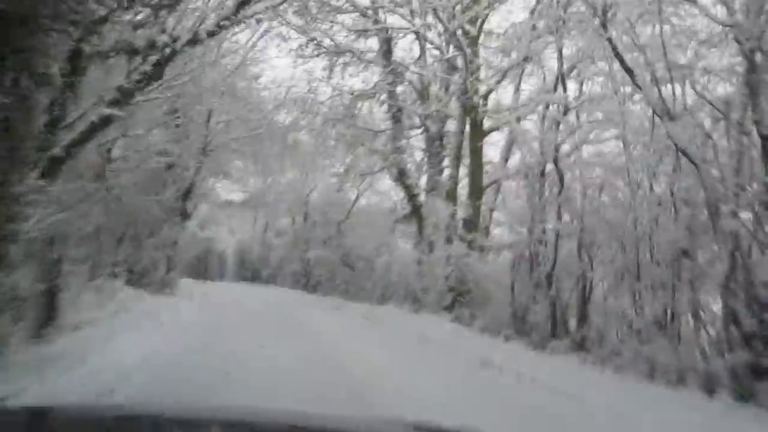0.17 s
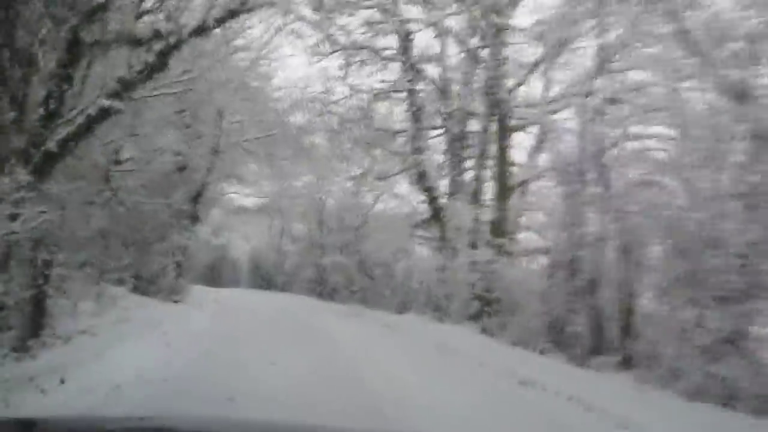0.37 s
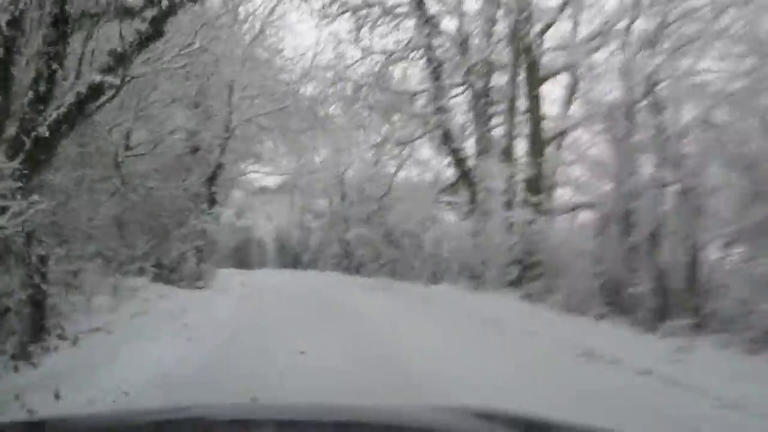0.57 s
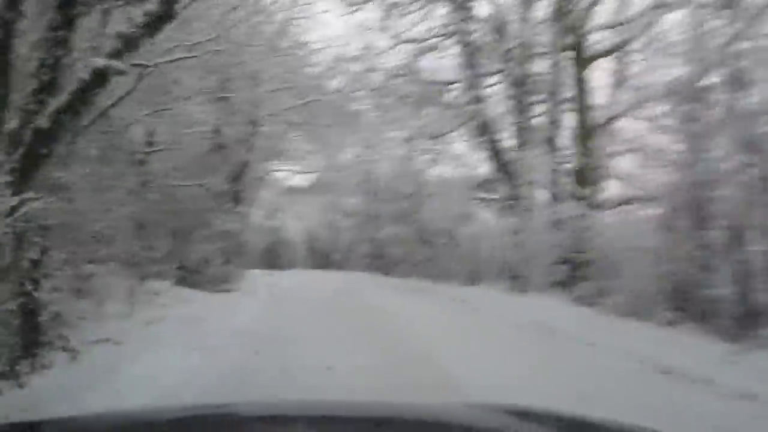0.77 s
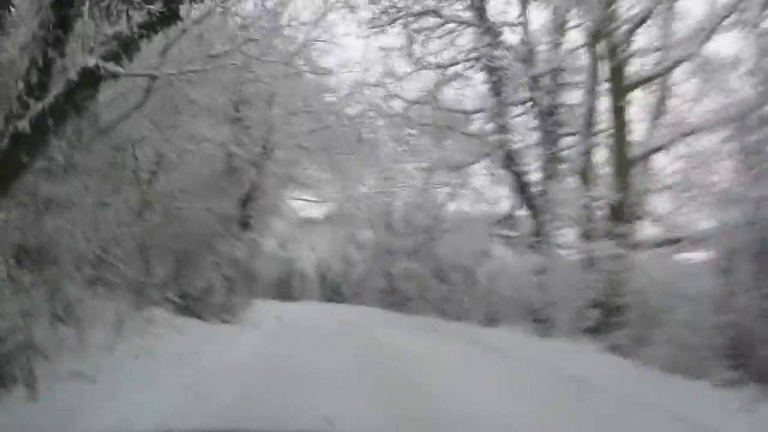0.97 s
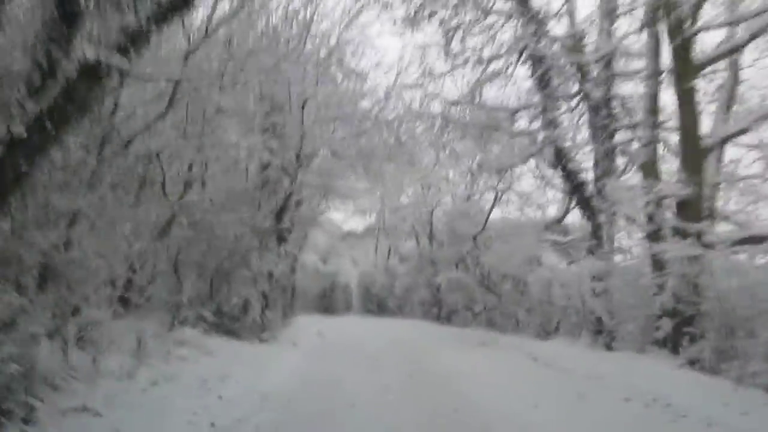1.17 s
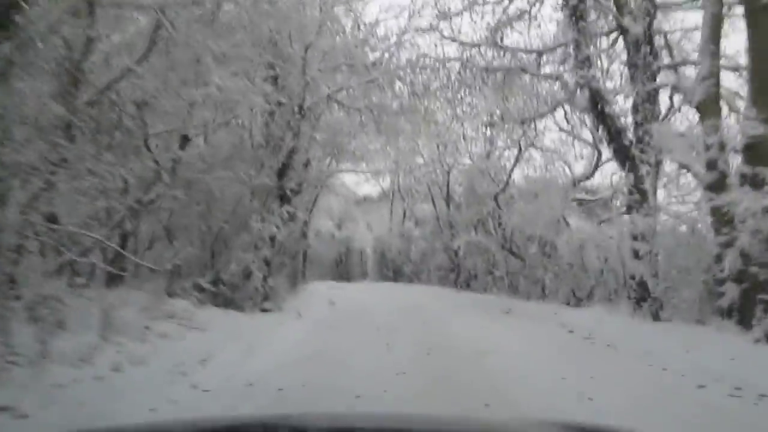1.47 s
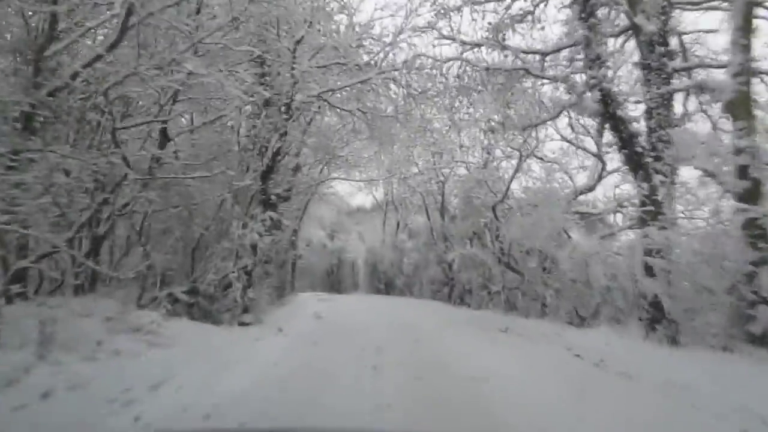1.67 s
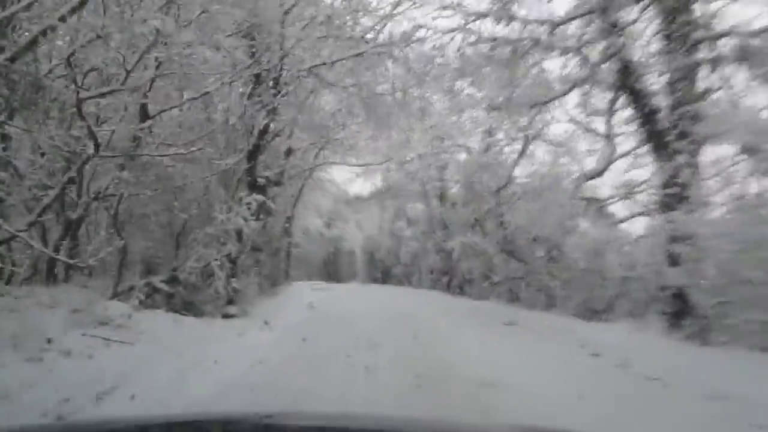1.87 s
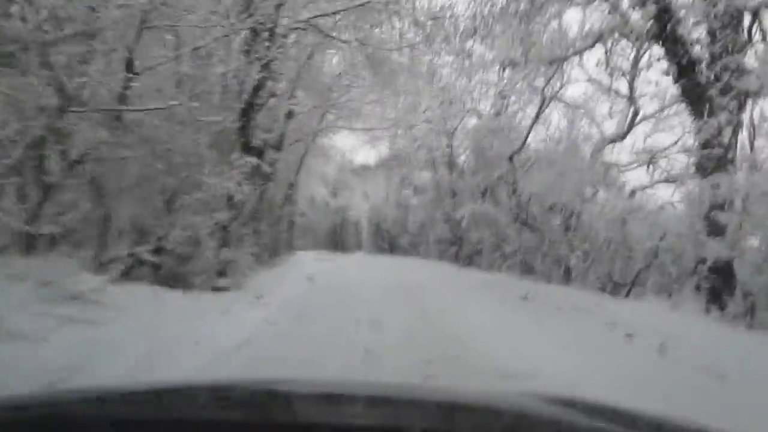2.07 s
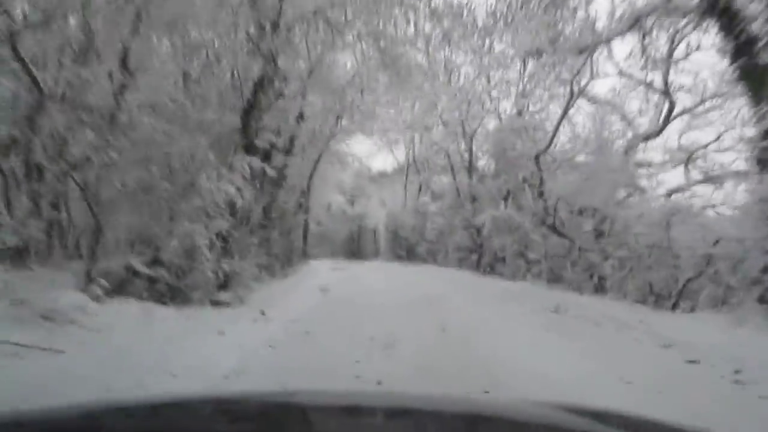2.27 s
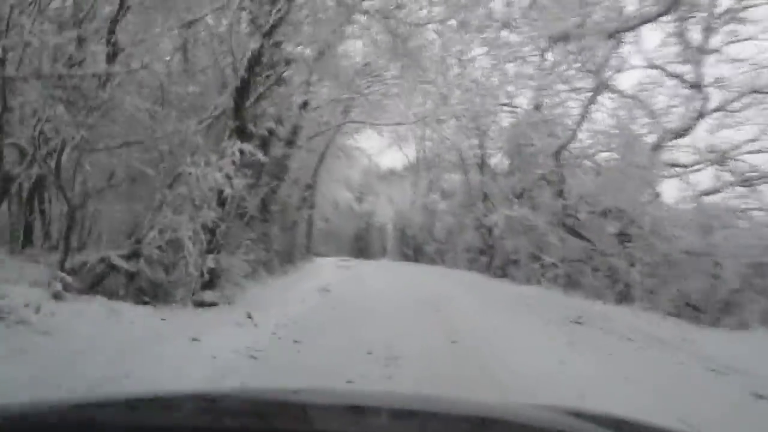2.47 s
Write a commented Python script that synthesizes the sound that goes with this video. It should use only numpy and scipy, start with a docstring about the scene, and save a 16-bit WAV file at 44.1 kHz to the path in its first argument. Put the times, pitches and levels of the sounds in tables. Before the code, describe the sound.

Deep rumble inside a moving car, with engine hum, tyres on snow and lightly ticking trim.

```python
"""A bumpy road shakes a car, heard from inside as it rolls steadily along a snowy lane.
The body rumbles, the air in the cabin booms, the panels drum and the wheels thud over ruts.
Under that, the engine hums with its firing and the tyres rush on packed snow. Close by,
small plastic parts tick and rustle, over a faint, high electrical whine."""
import sys
import numpy as np
from scipy import signal
from scipy.fft import rfft, irfft
from scipy.io import wavfile
from scipy.ndimage import uniform_filter1d

SR = 44100
rng = np.random.default_rng(int(sys.argv[2]) if len(sys.argv) > 2 else 0)


def wav_out(sig):
    """Save sig, one row per channel (or a flat mono array), as 16-bit PCM at SR to the path in sys.argv[1]."""
    wavfile.write(sys.argv[1], SR, np.round(np.clip(np.atleast_2d(sig).T, -1, 1) * 32767).astype(np.int16))


N = 115101


def gain(db):
    """Turn decibels into a number to multiply by."""
    return 10 ** (np.asarray(db) / 20)


def unit(x):
    """Scale a signal to an average strength (rms) of 1."""
    return x / np.sqrt(np.mean(x ** 2))


def curve(table, col=1):
    """One column of a table, joined by straight lines in time."""
    rows = np.array(table)
    return np.interp(np.arange(N) / SR, rows[:, 0], rows[:, col])


def frequencies():
    """The frequency of each point in the spectrum, at least 1 Hz."""
    return np.maximum(np.arange(N // 2 + 1) * SR / N, 1)


def colour(x, spectrum):
    """Shape the lows and highs of x by a table, fading past both ends; the result has strength 1."""
    hz, db = np.array(spectrum).T
    f = frequencies()
    ends = np.minimum(f / hz[0], 1) ** 2 * np.minimum(hz[-1] / f, 1) ** 8
    shape = gain(np.interp(np.log(f), np.log(hz), db))
    return unit(irfft(rfft(x) * ends * shape, N))


def ringing_noise(hz, width_hz):
    """Noise gathered around one pitch."""
    peak = 1 / (1 + 2 * ((frequencies() - hz) / width_hz) ** 2)
    return unit(irfft(rfft(rng.standard_normal(N)) * peak, N))


def wander(rate_hz):
    """A smooth random wobble of typical size 1; a higher rate wobbles faster."""
    span = int(SR / rate_hz)
    return unit(uniform_filter1d(uniform_filter1d(rng.standard_normal(N), span), span))


def whine(hz=7882, level_db=-74, rough_db=-3):
    """A thin electrical tone, roughened by noise close to its pitch."""
    tone = np.sqrt(2) * np.sin(2 * np.pi * hz * np.arange(N) / SR)
    return gain(level_db) * (tone + gain(rough_db) * ringing_noise(hz, width_hz=110))


# Plastic parts scraping (start [s], end [s], level [dB])
SCRAPE_STROKES = [(.04, .16, -70), (.28, .56, -66.5)]
def scrapes(flutter_db=3.0):
    """Plastic slides on plastic with a thin sizzle that swells and fades."""
    t, swells = np.arange(N) / SR, np.zeros(N)
    for start, end, db in SCRAPE_STROKES:
        progress = np.clip((t - start) / (end - start), 0, 1)
        swells += gain(db) * np.sqrt(np.abs(np.sin(np.pi * progress)))
    sizzle = ringing_noise(5050, width_hz=450) * gain(flutter_db * wander(90))
    return swells * unit(sizzle)


# The tone of rubbing plastic (frequency [Hz], relative level [dB])
RUSTLE_SPECTRUM = [(2500, -6.5), (4000, -6), (5200, -1.5), (6300, -1), (8000, 3.5), (9700, 3),
                   (11000, -3.5), (13000, -10.5), (15500, -17)]
# How loud the rubbing is (time [s], level [dB])
RUSTLE_LOUDNESS = [(0, -62), (.12, -63.5), (.19, -59), (.3, -64.5), (.6, -67.5), (.8, -64.5), (.9, -61),
                   (1.02, -64), (1.06, -58.5), (1.11, -63), (1.35, -64.5), (1.62, -65), (1.71, -61),
                   (1.82, -64.5), (1.91, -58.5), (1.94, -58.5), (1.98, -53), (2.02, -62.5), (2.2, -61.5),
                   (2.33, -63.5), (2.44, -59), (2.6, -60)]
def rustle(grains_per_s=1200, spread_db=2.5, grain_gain=.45):
    """Plastic rubs on plastic: a hiss with tiny random clicks, or grains, in it."""
    hits = rng.random(N) < grains_per_s / SR
    grains = unit(hits * rng.standard_normal(N) * gain(spread_db * rng.exponential(size=N)))
    rubbing = rng.standard_normal(N) + grain_gain * grains
    return colour(rubbing, RUSTLE_SPECTRUM) * gain(curve(RUSTLE_LOUDNESS))


# Pitches at which the plastic trim rings (frequency [Hz], width [Hz], relative level [dB])
TRIM_RESONANCES = [(2060, 320, 2), (2520, 530, 1.5), (2900, 450, -3), (3666, 260, 2.5), (4170, 290, 1)]
# Short bursts of noise (time [s], body level [dB], edge level [dB], snap level [dB],
# body pitch [Hz], snap pitch [Hz], time before fading [s])
# The row at 1.144 s is a faint, brief high hiss just before the tick at 1.148 s.
SHORT_BURSTS = [(.046, -55, -51.5, -51, 3600, 9500, .0005), (.2110, -48, -60, -52, 3750, 8000, 0.0011),
                (0.2623, -48.5, -54, -41, 3200, 9350, .0002), (.5308, -61, -52.5, -48.5, 3600, 9800, .0008),
                (0.851, -60, -62, -50.5, 3600, 10800, .0005), (1.0430, -62, -64, -61, 3600, 7500, .0005),
                (1.052, -62, -66, -57, 3600, 9200, 0.0045), (1.0586, -47, -61, -53, 4000, 8500, .0004),
                (1.0672, -52, -67, -54.5, 3470, 9400, 0.0082),
                (1.0735, -36, -49.5, -60, 2850, 9700, 0.00022),
                (1.144, -65, -62, -54.5, 3600, 9200, 0.0033), (1.1483, -43.5, -64, -54, 3200, 9600, .0005),
                (1.2330, -59, -58, -54, 3600, 9500, .0005), (1.556, -62, -62, -58, 3600, 9900, .0005),
                (1.6958, -59, -62, -54, 4000, 7500, .002), (1.7638, -49, -48, -44, 4900, 9300, 0.0013),
                (1.7860, -57, -58, -58, 4400, 9000, .001), (1.864, -58, -56, -49, 3600, 9000, .0015),
                (1.8906, -56, -68, -45, 3600, 8900, 0.0019), (2.029, -55, -57, -53, 3600, 9000, .0005),
                (2.274, -52, -47, -49, 4400, 8900, .0006), (2.481, -64, -53, -64, 4400, 9000, 0.00091)]
def ticks(rise_s=.00017, decay_s=.0021, echo_s=.011, echo_db=-20.5):
    """Short bursts, mostly loose trim ticking: a ringing body and edge, a bright snap, a cabin echo."""
    size = 2048
    t, f = np.arange(size) / SR, np.arange(size // 2 + 1) * SR / size
    out = np.zeros(N + size)

    def band(hz, width_hz):
        return 1 / (1 + ((f - hz) / width_hz) ** 2) ** 2

    trim = sum(gain(db) * band(hz, width) for hz, width, db in TRIM_RESONANCES)
    edge = band(5370, width_hz=550)
    soft_top = 1 / np.sqrt(1 + (f / 11200) ** 16)  # dulls the snap above 11200 Hz
    for at, body_db, edge_db, snap_db, body_hz, snap_hz, hold_s in SHORT_BURSTS:
        first, age = int(at * SR), np.maximum(t - hold_s, 0)
        fade = np.exp(-age / decay_s) + gain(echo_db) * np.exp(-age / echo_s)
        envelope = np.minimum(t / rise_s, 1) * fade
        strength = np.sqrt(np.mean(envelope ** 2))
        body = trim * band(body_hz, width_hz=1900)
        snap = soft_top * band(snap_hz, width_hz=4100)
        for db, shape in ((body_db, body), (edge_db, edge), (snap_db, snap)):
            noise = irfft(shape * rfft(rng.standard_normal(size)))
            out[first:first + size] += gain(db) * strength * unit(noise * envelope)
    return out[:N]


# The tone of tyres on snow, heard through the car's body (frequency [Hz], relative level [dB])
TYRE_SPECTRUM = [(550, -24), (680, -6.5), (800, -4), (930, 2.5), (1200, -4.5), (1500, -12), (2000, -18.5),
                 (2900, -18), (3700, -25), (5000, -28.5), (7000, -36.5), (12000, -56)]
# How loud the tyres are (time [s], level [dB])
TYRE_LOUDNESS = [(0, -47), (.8, -47.5), (1.4, -46.5), (2.1, -45.5), (2.6, -47)]
def tyres(flutter_db=.94):
    """The tread presses the snow and makes a dull, slightly fluttering rush."""
    rush = colour(rng.standard_normal(N), TYRE_SPECTRUM)
    return rush * gain(curve(TYRE_LOUDNESS) + flutter_db * wander(50))


# The tones in the engine's hum (multiple of the firing rate [1], base level [dB])
ENGINE_TONES = {1: -28, 2: -35, 4: -44.5, 6: -42.5, 10: -54}
# How the hum swells and sinks (time [s], level change [dB])
ENGINE_SWELL = [(0, -6), (.17, 4), (.26, -2.5), (.6, -2), (1.03, 0.5), (1.25, -1.5), (1.6, 2), (1.7, -2.5),
                (2.1, 1), (2.6, 0)]
def engine(firing_hz=53.18, speed_drift=.00097, waver_db=.7):
    """The engine fires at a low, nearly steady rate and hums at multiples of that rate."""
    rate_hz = firing_hz * (1 + speed_drift * wander(7.5))
    phase = 2 * np.pi * np.cumsum(rate_hz) / SR
    hum = np.zeros(N)
    for multiple, db in ENGINE_TONES.items():
        height = np.sqrt(2) * gain(db + waver_db * wander(6))
        hum += height * np.sin(multiple * phase + 2 * np.pi * rng.random())
    return hum * gain(curve(ENGINE_SWELL))


# The wheels dropping over ruts (time [s], peak level [dB], pitch [Hz])
RUT_THUDS = [(.16, -13.5, 75), (0.328, -24, 161), (0.466, -13, 40.9), (0.863, -12, 71), (1.321, -16, 68.6),
             (1.349, -28, 188), (1.496, -11.5, 72.3), (1.654, -17.5, 59.3), (2.018, -19.5, 79),
             (2.097, -20.5, 177), (2.425, -11, 53.7)]
def ruts(rise_cycles=.95):
    """Each rut gives a short, soft thud: deep through the suspension, higher in the panels."""
    out = np.zeros(N)
    for at, db, hz in RUT_THUDS:
        cycles = hz * np.maximum(np.arange(N) / SR - at, 0)
        swell = (cycles / rise_cycles * np.exp(1 - cycles / rise_cycles)) ** 2
        out += gain(db) * swell * np.sin(2 * np.pi * cycles)
    return out


# The tone of the body's deep shaking (frequency [Hz], relative level [dB])
RUMBLE_SPECTRUM = [(15, -2.5), (22, 3.5), (34, -1), (45, 4.5), (54, -6), (62, -9.5), (90, -34)]
# The tone of the drumming panels (frequency [Hz], relative level [dB])
PANEL_SPECTRUM = [(70, -4), (95, 2), (112, 4), (128, -1), (148, -0.5), (163, 5), (182, 1.5), (198, -5.5),
                  (235, -3), (285, -3.5), (302, -9), (328, -10), (345, -9.5), (420, -12), (520, -11.5),
                  (600, -9.5), (635, -20), (700, -23)]
# How the shaking rises and falls (time [s], rumble change [dB], boom change [dB])
ROAD_SHAKE = [(0, 3, 1.5), (.18, -5, 0), (.33, -5, -4), (.5, 4.5, -1), (.68, 0.5, 2), (.82, -5.5, -6.5),
              (.98, -4.5, -14), (1.15, 0.5, -3), (1.38, -1, -5), (1.52, -3, 2), (1.7, -1.5, -1.5),
              (1.9, 0.5, -7.5), (2.06, -3.5, 3), (2.25, 1.5, -1.5), (2.35, 0, -7), (2.46, 6.5, -2),
              (2.6, 4.5, -2)]
def road(rumble_db=-19.5, boom_db=-23.5, panels_db=-32, jolt_db=.32):
    """The uneven road shakes the car: the body rumbles, the cabin air booms and the panels drum."""
    rumble = colour(rng.standard_normal(N), RUMBLE_SPECTRUM) * gain(rumble_db + curve(ROAD_SHAKE))
    boom = ringing_noise(77.44, width_hz=8.6) * gain(boom_db + curve(ROAD_SHAKE, col=2))
    panels = colour(rng.standard_normal(N), PANEL_SPECTRUM) * gain(panels_db + jolt_db * wander(10))
    return rumble + boom + panels


def scene():
    """Everything as heard from the front seat, in one channel."""
    return (road() + ruts() + tyres() + engine() + rustle() + scrapes() + ticks() + whine())[None]


def record(dry, start_s=.035, fade_in_s=.004, top_hz=15800):
    """The microphone opens after a moment and cuts off the highest treble."""
    opened = np.clip((np.arange(N) / SR - start_s) / fade_in_s, 0, 1)
    treble_cut = signal.ellip(8, .2, 70, top_hz, fs=SR, output="sos")
    return signal.sosfilt(treble_cut, dry * opened)


dry = scene()
out = record(dry)
wav_out(out)
```